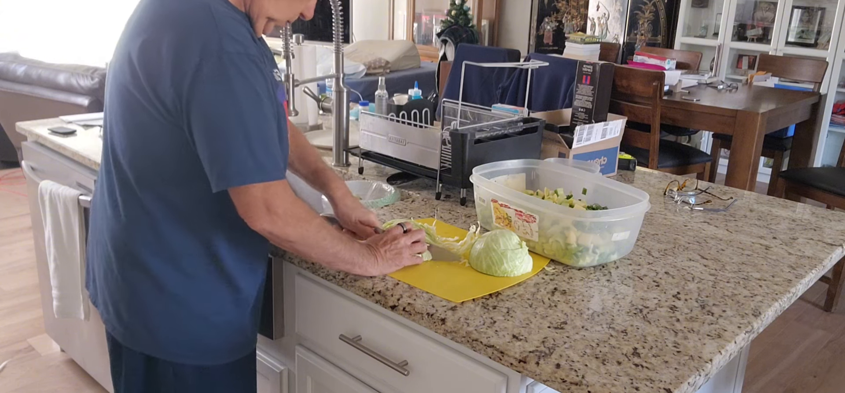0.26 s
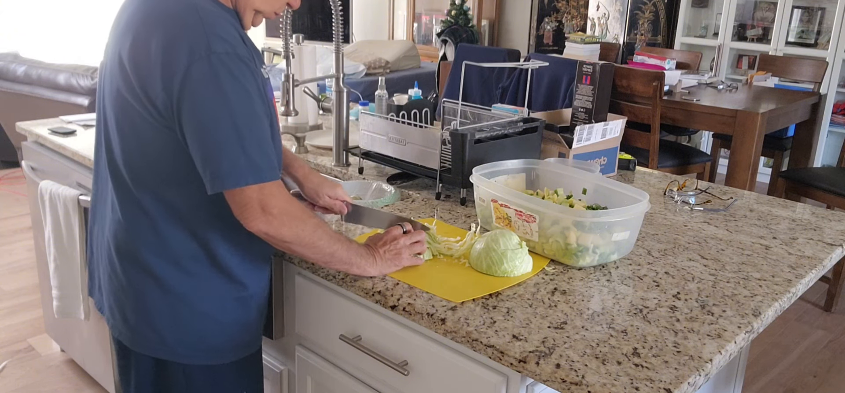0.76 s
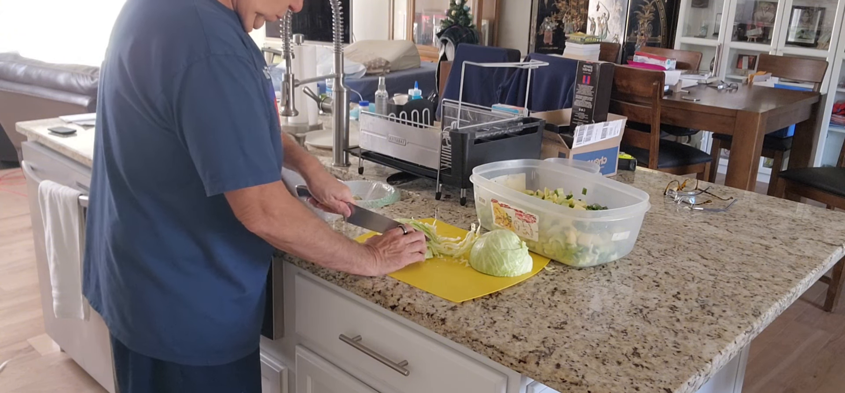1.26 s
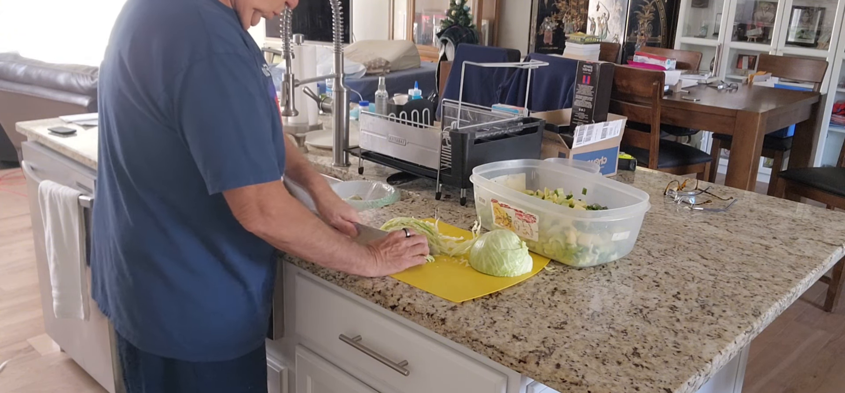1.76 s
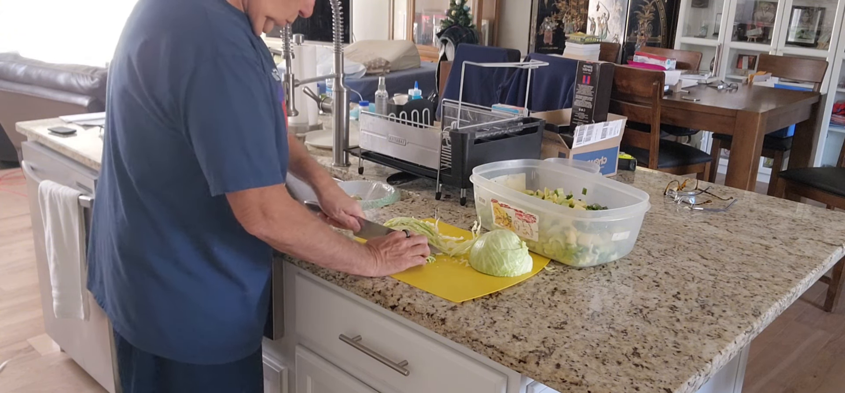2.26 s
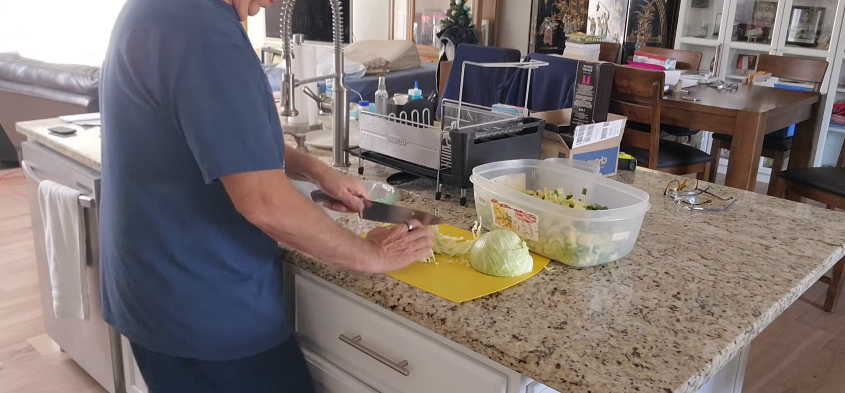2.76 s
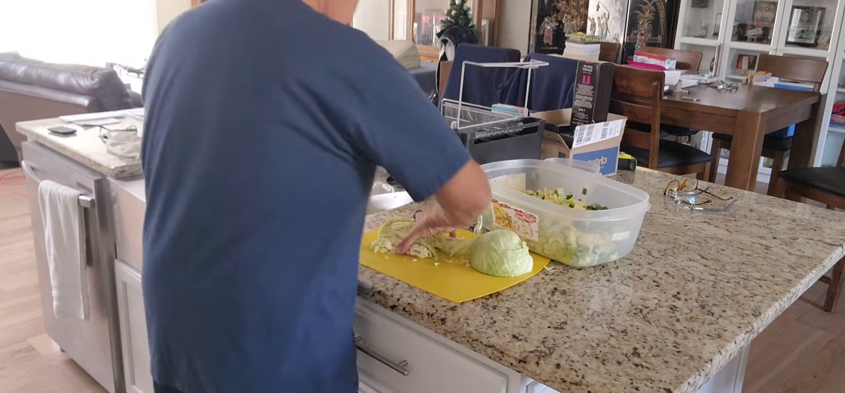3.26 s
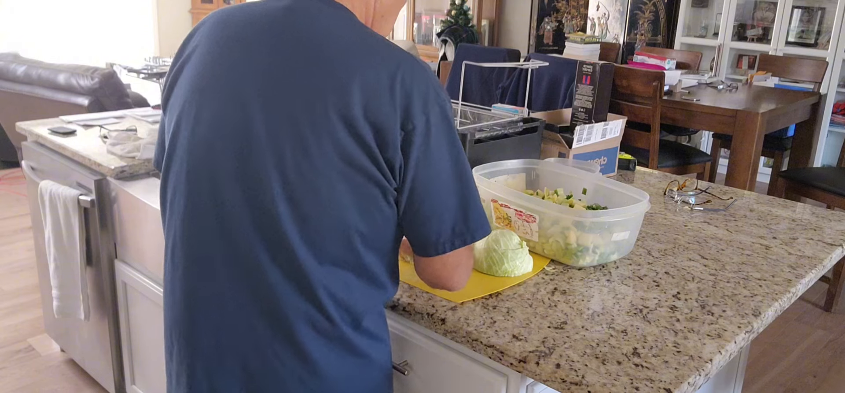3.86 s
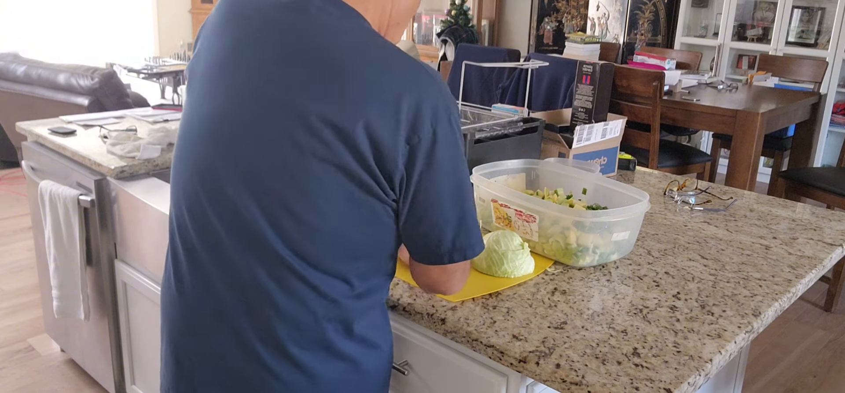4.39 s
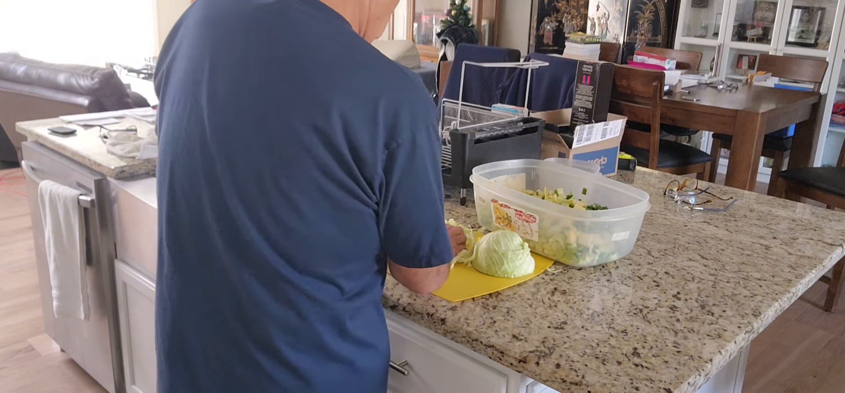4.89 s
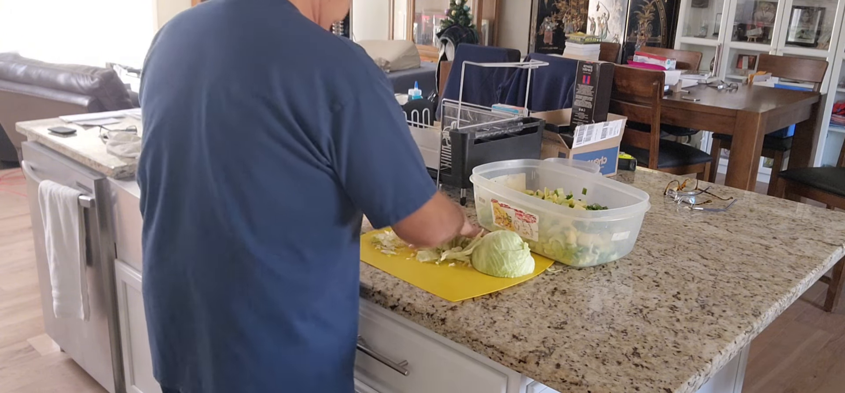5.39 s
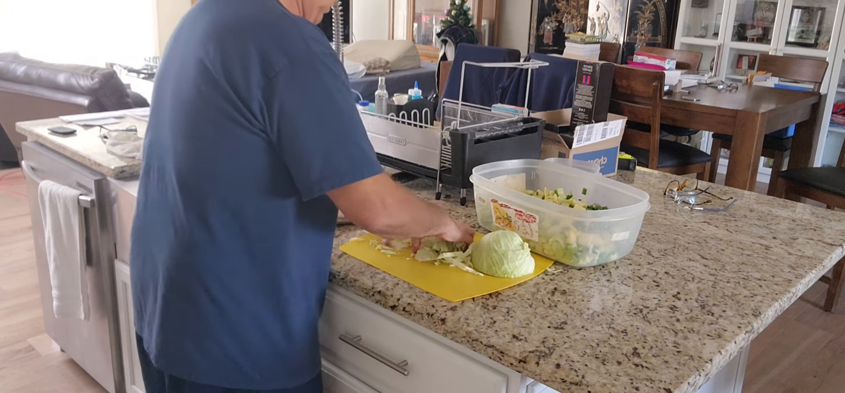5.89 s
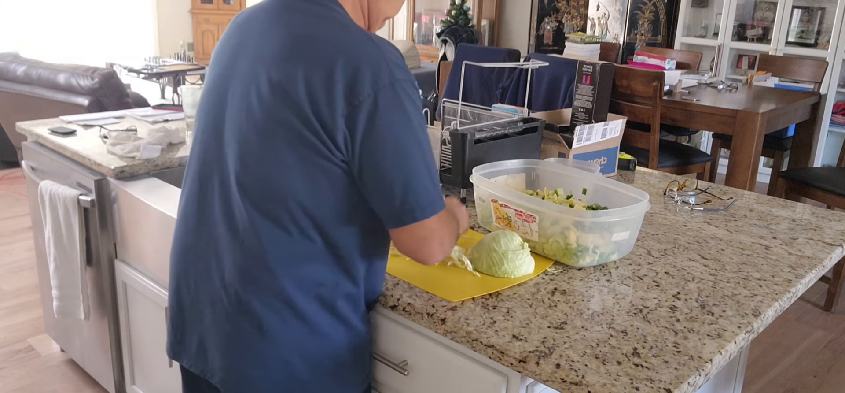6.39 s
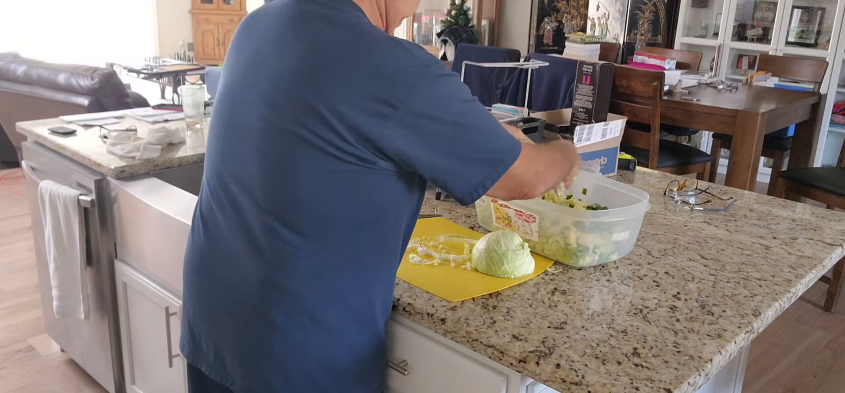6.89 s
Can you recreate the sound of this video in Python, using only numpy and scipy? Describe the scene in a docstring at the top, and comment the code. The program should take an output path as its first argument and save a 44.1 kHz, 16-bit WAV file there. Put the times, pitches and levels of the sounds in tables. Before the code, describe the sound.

In a lively home kitchen, heard from a few steps away, a knife crunches through cabbage in three strokes, each ending in a woody knock on a thin plastic board over stone. Ribs snap sharply. Hands rustle and push the wet shreds together with light bumps. The steel knife is then set down with bright pings, a handle thud and a quick rattle to rest, and shreds are scooped up. A low steady hum and faint sinking drone lie underneath.

```python
"""Cutting cabbage on a kitchen counter

Cabbage is cut on a thin plastic board on stone: three strokes crunch as bursts of clicks and hiss, single cracks
are ribs snapping and faint crackles of handling, wet leaves rasp by stick and slip, and blows excite the board's
resonances. The shreds rustle as they are pushed together; the steel knife is laid down, its blade a sum of dying
sines and its handle a resonant thud; then hands scoop up the shreds. Dying noise tails make the echoes.
A motor hums as one sine, a faint far drone of harmonics sinks in pitch, and filtered noise is the air."""
import sys
import numpy as np
from scipy import signal
from scipy.fft import rfft, irfft, next_fast_len
from scipy.io import wavfile
from scipy.ndimage import uniform_filter1d, map_coordinates

SR = 44100
rng = np.random.default_rng(int(sys.argv[2]) if len(sys.argv) > 2 else 0)


def wrap_up_sound(samples):
    """Save the sound to the file named by the first command line argument, as 16-bit audio."""
    columns = np.atleast_2d(samples).T
    # keep every value between -1 and 1, then stretch to whole-number steps
    tamed = np.clip(columns, -1, 1)
    steps = np.round(tamed * 32767).astype(np.int16)
    wavfile.write(sys.argv[1], SR, steps)


N = 314874

# Levels in dB are relative: the gains of each source and of the mix come on top.

# Drift of the air noise. Each row: time in seconds, level in dB.
AIR_LEVELS = [(0, -67), (2, -70.5), (3.8, -67.5), (5.3, -70), (7.14, -66.5)]
# Spectrum of the air noise. Each row: frequency in Hz, filter gain in dB.
AIR_SPECTRUM = [(100, -37), (200, -14), (300, -18.5), (550, -24.5), (1000, -29), (1600, -30.5),
                (2400, -34.5), (4000, -34), (8200, -35), (9500, -45.5), (15500, -54)]
# Spectrum of the low rumble. Each row: frequency in Hz, filter gain in dB.
RUMBLE_SPECTRUM = [(15, -13), (28, -2), (60, 0.5), (110, -3), (180, -6.5), (260, -21.5), (400, -43.5)]
# Harmonics of the drone. Each row: multiple of its pitch, level in dB.
DRONE_HARMONICS = [(2, -2), (3, -5.5), (4, -4), (6, -15.5), (8, -22)]
# Single cracks: ribs snapping, and faint crackles of handling.
# Each row: start in seconds, level in dB, pitch in Hz.
SINGLE_CRACKS = [(0.0911, -45, 3900), (0.1486, -43, 3840), (0.18, -33, 3130), (0.2244, -33.5, 3380),
                 (0.964, -58.5, 4540), (1.0163, -47, 3450), (1.271, -59, 4290), (1.445, -47, 4540),
                 (1.494, -37.5, 1300), (1.587, -33.5, 2960), (2.309, -38.5, 4900), (2.3524, -47, 5640),
                 (2.9459, -40, 4500), (3.3552, -48, 3720), (4.0756, -47, 3280), (4.1285, -53, 3570),
                 (4.3454, -45, 4580), (5.032, -53, 4550), (5.4819, -56.5, 5330), (6.6678, -56.5, 4750)]
# Spectrum of leaf noise. Each row: frequency in Hz, filter gain in dB.
LEAF_SPECTRUM = [(100, -22), (240, 0), (380, -10.5), (700, -10.5), (1400, -3.5), (2200, 2.5), (3500, 3.5),
                 (5000, 1.5), (6500, -4), (8000, 0), (9500, -11), (15000, -12.5)]
# Pushes of the blade through the leaves. Each row: start in seconds, length in seconds,
# final crunch in dB, its growth on the way in dB, final body in dB relative to the crunch.
BLADE_PUSHES = [(0.095, 0.18, -42, 14.5, 0), (1.44, 0.15, -47.5, 9, -2.5), (2.289, 0.072, -50, 7, -2),
                (2.401, 0.034, -43.5, 9, -2.5)]
# Wet leaves rubbing on blade or board. Each row: time of the peak in seconds, level in dB, pitch in Hz,
# half the duration in seconds.
LEAF_RUBS = [(0.144, -57, 5650, 0.026), (2.338, -57, 5100, 0.031), (2.422, -53, 5060, 0.021),
             (2.96, -55, 5000, 0.025), (3.051, -52.5, 3730, 0.041), (4.241, -52.5, 4640, 0.052),
             (4.591, -49.5, 6060, 0.023), (4.652, -52, 4900, 0.021), (6.309, -56.5, 4030, 0.035)]
# Blows on the board. Each row: start in seconds, knock in dB, thump and click in dB relative to the knock,
# pitch of the struck spot in Hz, boost at that pitch in dB, share that fills the room in dB.
BOARD_BLOWS = [(0.2639, -32, 3, 1, 1520, 3, -2.5), (1.6063, -38.5, 2, -2, 1060, 5, -1.5),
               (2.4474, -31, -2.5, -6, 1600, 2.5, -0.5), (2.743, -66, 19, 4.5, 503, -6, 2.5),
               (3.2211, -45, -2, -7, 570, 5, -1.5), (3.5634, -59, -7, -23, 1400, 4, 1),
               (4.84, -41.5, -4, -17.5, 1020, 13.5, -3.5), (6.568, -52.5, 5, -7, 1590, 10, -5),
               (6.918, -62, 6.5, -8, 384, 20, 1)]
# Resonances of the board on the counter. Each row: frequency in Hz, width in Hz, level in dB.
BOARD_MODES = [(232, 31, 3.5), (532, 100, 3), (803, 79, 3.5), (1060, 173, -4), (1320, 173, -0.5),
               (1528, 274, -2), (2130, 360, -1.5), (3220, 350, -1), (4045, 130, -2.5), (4760, 590, -5)]
# Hand moves through the shreds. Each row: start in seconds, length in seconds, rustle in dB,
# body and fizz in dB relative to the rustle.
HAND_MOVES = [(1.385, 0.045, -68, -16, -12), (2.904, 0.066, -54, -4, -19), (3.054, 0.023, -50.5, -2, -21),
              (3.37, 0.17, -62, -0.5, -11), (4.137, .15, -50.5, -5, -9.5), (4.585, 0.0071, -55.5, -8, -5),
              (4.647, 0.0099, -50.5, -5, -30), (4.763, 0.064, -52.5, -5, -9.5), (6.188, 0.14, -50, -8, -15),
              (6.375, 0.02, -56, -8, -11), (6.808, 0.26, -56.5, -11.5, -9)]
# The knife touching down. Each row: start in seconds, ring, handle thud and tick in dB,
# flatness from 0 on its edge to 1 on its side.
KNIFE_TOUCHES = [(5.536, -31.5, -45.5, -33.5, 0.097), (5.629, -34, -68, -37.5, 0.34),
                 (5.708, -28, -25, -43, 0.84), (5.752, -25, -28.5, -36.5, 0.95)]
# Modes of the steel blade. Each row: frequency in Hz, level struck on its edge in dB,
# level struck on its side in dB, time to decay by 60 dB in seconds.
BLADE_MODES = [(1647, -10, -18, .4), (2380, -5, -24, .12), (3418, -7, -8, .7), (4197, -6, -20, .42),
               (4468, -7, -18, .3), (4517, -20, -2, .55), (4690, -12, 1, .12), (4820, -5, 2, .36),
               (4930, -10, -2, .1), (5046, -3, -4, .28), (5424, 3, -20, .28), (5771, -3, -22, .4),
               (6558, -22, -9, .28), (6825, -20, 0, .3), (7178, -12, -12, .28), (7504, 0, -20, .12),
               (7665, -6, -22, .15), (8145, -22, -11, .28), (8830, -10, -14, .18), (10147, -18, -12, .18),
               (10290, -9, -16, .18), (11854, 2, -12, .18), (12586, -14, -13, .18), (13300, -10, -17, .16),
               (13781, -5, -24, .18), (14980, -9, -24, .16)]
# Resonances of the handle on the counter. Each row: frequency in Hz, width in Hz, level in dB.
HANDLE_MODES = [(126, 52, -2.5), (252, 29, 6.5), (318, 47, -1.5), (410, 40, 2.5), (533, 55, -1),
                (643, 38, 0.5), (779, 60, -2.5), (983, 160, -3), (1200, 195, -5), (1560, 148, -4.5),
                (2000, 40, -7.5)]
# Spectrum of the tick of steel on stone. Each row: frequency in Hz, filter gain in dB.
TICK_SPECTRUM = [(200, -17), (1000, -5), (2400, -0.5), (5000, 3.5), (7500, -5), (9500, -7.5), (12000, -8),
                 (15500, -12.5)]
# Reverberation of the kitchen. Each row: frequency in Hz, time to decay by 60 dB in seconds.
KITCHEN_DECAY = [(150, 0.69), (530, 0.72), (1400, 0.8), (3700, 0.61), (9700, 0.54), (15000, 0.3)]

# The drone sinks in pitch and dulls at an even pace, and fades toward the end.
DRONE_HZ, DRONE_SAG_HZ_PER_S = 38.45, 0.46
DRONE_DB, DRONE_FADE_S, DRONE_FADE_DB_PER_S = -56.5, 4.2, 3.5
DRONE_BRIGHT_DB, DRONE_DULLS_DB_PER_S = 3, 0.74  # tilt of its harmonics, per octave
CRACK_BOOST_DB, CRACK_FIZZ_DB = 11, -1  # at the crack's pitch, and above 10 kHz
CUT_ATTACK_S, CUT_RELEASE_S = 0.0029, 0.0093
CUT_BODY_GROWS_DB = 9.5  # thick ribs gain on the crunch as the blade goes deeper
JUICE_DB, JUICE_GROWS_DB = -59.5, 5.5  # the fizz hardly depends on the force
SWEEP_ATTACK_S, SWEEP_RELEASE_S = 0.073, 0.055  # time to swell or fade by 20 dB
SWEEP_SAG_DB_PER_S = 16.5  # the heap loosens under the hand
# The knife rocks to rest on its side, a little weaker at each contact.
ROCK_START_S, ROCK_PERIOD_S, ROCK_LOSS_DB = 5.785, 0.0335, 1.52
ROCK_RING_DB, ROCK_THUD_DB, ROCK_TICK_DB = -41.5, -33, -37
TOP_HZ = 15830


def amp(db):
    """Gain is ten to the power of decibels over twenty."""
    return 10 ** (np.asarray(db) / 20)


def unit(x):
    """Normalization to an rms of 1."""
    return x / np.sqrt(np.mean(x ** 2) + 1e-20)


def along(points, hz):
    """Interpolation of (Hz, value) points on a logarithmic axis."""
    f, v = np.transpose(points)
    return np.interp(np.log(hz + 1), np.log(f + 1), v)


def wobble(rate):
    """Smooth random fluctuation: a spline through random knots, rate of them a second."""
    knots = rng.standard_normal(int(N * rate / SR) + 4)
    return map_coordinates(knots, [np.arange(N) * rate / SR])


def filtered(x, response):
    """Linear filtering: the spectrum is multiplied by a response of frequency."""
    n = x.shape[-1]
    m = next_fast_len(n + SR // 8, True)
    return irfft(rfft(x, m) * response(np.fft.rfftfreq(m, 1 / SR)), m)[..., :n]


def coloured(x, points, size=2048):
    """Minimum-phase filtering: folding the cepstrum makes a causal filter of the given (Hz, dB) shape."""
    cepstrum = irfft(np.log(amp(along(points, np.fft.rfftfreq(size, 1 / SR)))))
    cepstrum[1:size // 2] *= 2
    cepstrum[size // 2 + 1:] = 0
    return signal.fftconvolve(x, irfft(np.exp(rfft(cepstrum))))[:len(x)]


def boosted(x, hz, boost_db, octaves):
    """Spectral emphasis: a bump around one pitch."""
    return coloured(x, [(hz / 2 ** octaves, 0), (hz, boost_db), (hz * 2 ** octaves, 0)])


def resonant(x, modes):
    """Modal response: a body's (Hz, width, dB) resonances in parallel, with alternating signs."""
    def response(f):
        total = 0
        for k, (centre, width, db) in enumerate(modes):
            mode = 1j * f * width / (centre * centre - f * f + 1j * f * width)
            total = total + (-1) ** k * amp(db) * mode
        return total
    return filtered(x, response)


def band_rms(x, lo_hz, hi_hz):
    """Band energy of a short sound, as the rms it would have if it lasted 10 ms."""
    band = filtered(x, lambda f: (f > lo_hz) & (f < hi_hz))
    return np.sqrt(100 * np.sum(band ** 2) / SR)


def contact(chatter, t60):
    """Impact force: one sharp push followed by fine, dying chatter of the touching faces."""
    t = np.arange(SR // 4) / SR
    force = coloured(rng.standard_normal(len(t)), [(250, -13.5), (700, -1.0)]) * amp(-60 * t / t60)
    force *= chatter / np.linalg.norm(force)
    force[0] += 1
    return force


def add(track, s, sound):
    """Superposition: a sound is mixed in at time s."""
    part = track[max(round(s * SR), 0):][:len(sound)]
    part += sound[:len(part)]


def motor_hum(hum_hz=56.7, hum_db=-43):
    """Steady periodic source: a single sine whose level wavers slightly."""
    t = np.arange(N) / SR
    return np.sqrt(2) * amp(hum_db + 0.28 * wobble(1.0)) * np.sin(2 * np.pi * hum_hz * t)


def far_drone():
    """Harmonic series on a sinking fundamental, over a noise rumble that follows its fade in part."""
    t = np.arange(N) / SR
    phase = 2 * np.pi * np.cumsum(DRONE_HZ - DRONE_SAG_HZ_PER_S * t) / SR
    db = DRONE_DB - DRONE_FADE_DB_PER_S * np.maximum(t - DRONE_FADE_S, 0)
    bright_db = DRONE_BRIGHT_DB - DRONE_DULLS_DB_PER_S * t
    drone = np.zeros(N)
    for k, level_db in DRONE_HARMONICS:
        harmonic_db = db + level_db + bright_db * np.log2(k / 3) + 1.7 * wobble(2.37)
        drone += np.sqrt(2) * amp(harmonic_db) * np.sin(round(k) * phase)
    rumble_gain = amp(-62.5 + 0.38 * (db - db.mean()))
    return drone + rumble_gain * unit(coloured(rng.standard_normal(N), RUMBLE_SPECTRUM))


def room_air():
    """Diffuse noise: independent middle and side signals give partly alike left and right channels."""
    mid, side = (unit(coloured(rng.standard_normal(N), AIR_SPECTRUM)) for _ in range(2))
    side = coloured(side, [(150, -4.5), (600, -3.5), (3000, 1.5)])
    seconds, level_db = np.transpose(AIR_LEVELS)
    air_db = np.interp(np.arange(N) / SR, seconds, level_db) + 0.88 * wobble(1.86)
    return amp(air_db) * np.array([mid + side, mid - side])


def background():
    """Superposition of hum and drone, slightly stronger on the left, with the air of the room."""
    return (motor_hum() + far_drone()) * amp([[0.5], [-0.5]]) + room_air()


def single_cracks():
    """Impulsive excitation: each crack is one impact, emphasized at its own pitch."""
    track = np.zeros(N)
    for s, db, hz in SINGLE_CRACKS:
        crack = coloured(contact(chatter=1.4, t60=0.019), LEAF_SPECTRUM)
        crack = boosted(crack, hz, CRACK_BOOST_DB, octaves=0.23)
        crack = coloured(crack, [(6000, 0), (10000, CRACK_FIZZ_DB)])
        add(track, s, amp(db - 11.5) * crack / band_rms(crack, 1500, 9000))
    return track


def patchy(x, depth_db):
    """Random spectral modulation from leaf to leaf: gains that drift over about 900 Hz and 20 ms."""
    z = signal.stft(x, nperseg=256)[2]
    field = uniform_filter1d(rng.standard_normal(z.shape), size=5, axis=0)
    field = uniform_filter1d(field, size=7, axis=1)
    return signal.istft(z * amp(depth_db * unit(field)), nperseg=256)[1][:len(x)]


def crackle(levels, rate, spread_db, clump_db, hiss):
    """Crackling noise of bursting leaf cells: clumped tiny clicks over a wet hiss, in three bands."""
    sizes = rng.standard_normal(N) * amp(spread_db * np.minimum(rng.exponential(size=N), 3))
    grains = unit(sizes * (rng.random(N) < rate / SR))  # rate is clicks a second
    bursts = (grains + hiss * rng.standard_normal(N)) * amp(clump_db * wobble(120))
    source = coloured(patchy(bursts, 3.3), LEAF_SPECTRUM)

    def below(f, hz):
        return 1 / (1 + (f / hz) ** 10)
    # thick ribs give the body, thin leaves the crunch, juice the fizz
    body = filtered(source, lambda f: below(f, 2220))
    crunch = filtered(source, lambda f: below(f, 7770) - below(f, 2560))
    fizz = filtered(source, lambda f: 1 - below(f, 8960))
    return levels[0] * unit(body) + levels[1] * unit(crunch) + amp(4.0) * levels[2] * unit(fizz)


def cut_levels():
    """Growth under compression: body, crunch and fizz rise as leaves are squeezed against the board."""
    t, levels = np.arange(N) / SR, np.zeros((3, N))
    for s, length, db, growth_db, body_db in BLADE_PUSHES:
        end = s + length
        to_go = np.clip(1 - (t - s) / length, 0, 1)
        gate = np.interp(t, [s - CUT_ATTACK_S, s, end, end + CUT_RELEASE_S], [0, 1, 1, 0])
        crunch_db = db - growth_db * to_go
        full_body_db = crunch_db + body_db - CUT_BODY_GROWS_DB * to_go
        juice_db = JUICE_DB - JUICE_GROWS_DB * to_go
        levels += gate * amp([full_body_db, crunch_db, juice_db])
    return levels


def cutting():
    """Crackling noise under the blade: dense bursts shaped by the pushes."""
    return amp(-2.5) * crackle(cut_levels(), rate=1500, spread_db=1.5, clump_db=0.8, hiss=0.65)


def rubbing():
    """Stick-slip friction: a squeezed leaf slips at random instants, heard as a short, narrow rasp."""
    track = np.zeros(N)
    for s, db, hz, half_s in LEAF_RUBS:
        swell = np.hanning(int(2 * half_s * SR))
        slips = rng.standard_normal(len(swell)) * (rng.random(len(swell)) < 5000 / SR)
        rasp = unit(resonant(slips, [(hz, 0.17 * hz, 0)]))
        add(track, s - half_s, amp(db + 1) * swell * rasp)
    return track


def board():
    """Modal excitation: blows ring the board, each spot at its own pitch; also gives the room's share."""
    track, spill = np.zeros((2, N))
    for s, db, thump_db, click_db, spot_hz, spot_db, room_db in BOARD_BLOWS:
        hardness = [(500, thump_db), (800, 0), (1700, 0), (2800, click_db), (5200, click_db),
                    (8000, click_db + 0.5), (11000, click_db - 2.5)]
        knock = coloured(resonant(contact(chatter=1.23, t60=0.046), BOARD_MODES), hardness)
        knock = boosted(knock, spot_hz, spot_db, octaves=0.39)
        knock = amp(db) * knock / band_rms(knock, 520, 2130)
        add(track, s, knock)
        add(spill, s, amp(room_db) * knock)
    return track, spill


def sweep_levels():
    """Addition of powers: body, rustle and fizz of each move swell, sag a little and fade."""
    t, power = np.arange(N) / SR, np.zeros((3, N))
    for s, length, db, body_db, fizz_db in HAND_MOVES:
        before = np.maximum(s - t, 0) / SWEEP_ATTACK_S
        after = np.maximum(t - s - length, 0) / SWEEP_RELEASE_S
        sag_db = SWEEP_SAG_DB_PER_S * np.clip(t - s, 0, length)
        level_db = db - 20 * np.minimum(before + after, 10) - sag_db
        power += np.outer([amp(body_db), 1, amp(fizz_db)], amp(level_db)) ** 2
    return np.sqrt(power)


def rustling_shreds():
    """Crackling noise under the hands: softer, with less hiss and more uneven clicks than the cuts."""
    return amp(-3.0) * crackle(sweep_levels(), rate=1500, spread_db=3.0, clump_db=1.54, hiss=0.39)


def rocking(count=6):
    """Decaying repeated contact: the knife rocks on its side, as rows like those of KNIFE_TOUCHES."""
    first_db = np.array([ROCK_RING_DB, ROCK_THUD_DB, ROCK_TICK_DB])
    return [(ROCK_START_S + k * ROCK_PERIOD_S, *(first_db - k * ROCK_LOSS_DB), 1) for k in range(count)]


def blade_ring(flatness):
    """Free vibration: a sum of dying sines whose balance depends on how flat the blade lands."""
    t = np.arange(2 * SR // 3) / SR
    hz, edge_db, side_db, t60 = np.transpose(BLADE_MODES)
    dying = amp(-60 * t / t60[:, None]) * (1 - np.exp(-t / 0.00066))
    mode_db = edge_db + np.clip(flatness, 0, 1) * (side_db - edge_db)
    strengths = amp(mode_db + rng.normal(0, 1.0, len(hz)))
    # each way of resting on the counter detunes the blade slightly
    pitches = hz * rng.normal(1, 0.00064, len(hz))
    return amp(-4.0) * strengths @ (dying * np.sin(2 * np.pi * pitches[:, None] * t))


def handle_thud():
    """Damped modal response: an impact through the broad resonances of the handle on the counter."""
    thud = resonant(contact(chatter=1.12, t60=0.15), HANDLE_MODES)
    thud = coloured(thud, [(1800, -13), (2800, -10), (10000, -2)])
    return thud / band_rms(thud, 100, 2500)


def steel_tick(count=50):
    """High modal density: a crack and a crowd of short-lived high modes, new at every contact."""
    crack = contact(chatter=9.3, t60=0.19)
    t = np.arange(len(crack)) / SR
    mode_hz = rng.uniform(2000, 15500, (count, 1))
    crowd = rng.standard_normal(count) @ np.sin(2 * np.pi * mode_hz * t)
    tick = coloured(unit(crack) + 0.95 * unit(crowd * amp(-60 * t / 0.19)), TICK_SPECTRUM)
    return tick / band_rms(tick, 2200, 15500)


def knife():
    """Successive impacts: the edge touches first and rings; the handle lands and the knife rocks to rest."""
    track = np.zeros(N)
    for s, ring_db, thud_db, tick_db, flatness in KNIFE_TOUCHES + rocking():
        add(track, s, amp(ring_db) * blade_ring(flatness))
        add(track, s, amp(thud_db) * handle_thud())
        add(track, s, amp(tick_db) * steel_tick())
    return track


def tail(t60_points, seconds):
    """Reverberant decay: stereo noise whose frequencies die at their own speeds, left energy 1."""
    hz, t, z = signal.stft(rng.standard_normal((2, int(seconds * SR))), SR, nperseg=256)
    decay = amp(-60 * t / along(t60_points, hz)[:, None])
    mid, side = signal.istft(z * decay, SR, nperseg=256)[1]
    # long waves reach both ports alike
    side = coloured(side, [(120, -18.5), (280, -15.5), (600, -3.0), (1500, -0.5)])
    pair = np.array([mid + side, mid - side])
    return pair / np.linalg.norm(pair[0])


def kitchen(x, spill, near_db, room_db, count=12):
    """Room acoustics: direct sound a little from the left, counter and cupboard echoes, reverberation."""
    out = np.array([x, np.pad(x, (1, 0))[:N]])  # one sample later on the right
    for index in np.array_split(np.arange(N), count):  # each equal stretch of time gets freshly drawn echoes
        near = amp(near_db) * tail([(200, 0.057), (700, 0.15), (8000, 0.067)], 1 / 8)
        far = amp(room_db) * tail(KITCHEN_DECAY, 2 / 3)
        for sound, echo, delay_s in ((x, near, 0.0015), (spill, far, 0.008)):
            wet = signal.fftconvolve(sound[index][None], echo, axes=1)
            for ear in range(2):
                add(out[ear], index[0] / SR + delay_s, wet[ear])
    return out


def scene():
    """Superposition: all work at the counter shares the same room, and the background is added."""
    work = single_cracks() + cutting() + rubbing() + rustling_shreds() + knife()
    knocks, spill = board()
    return kitchen(work + knocks, work + spill, near_db=1.5, room_db=0.5) * amp(-1.5) + background()


def record(dry):
    """Band limiting: the phone keeps nothing above its top frequency."""
    return filtered(dry, lambda hz: hz < TOP_HZ)


dry = scene()
out = record(dry)
wrap_up_sound(out)
```